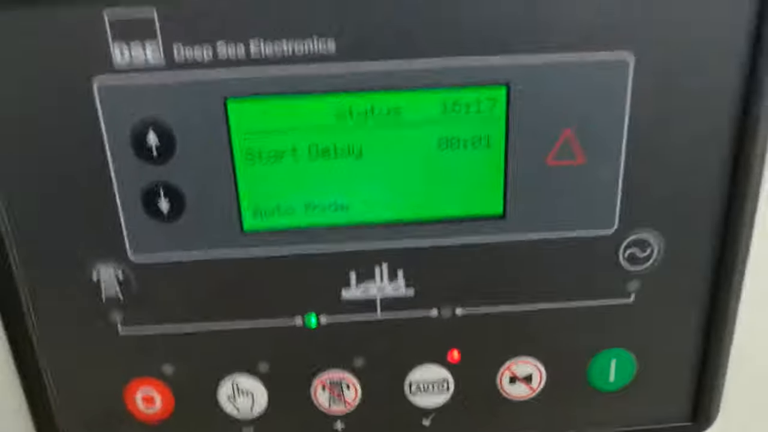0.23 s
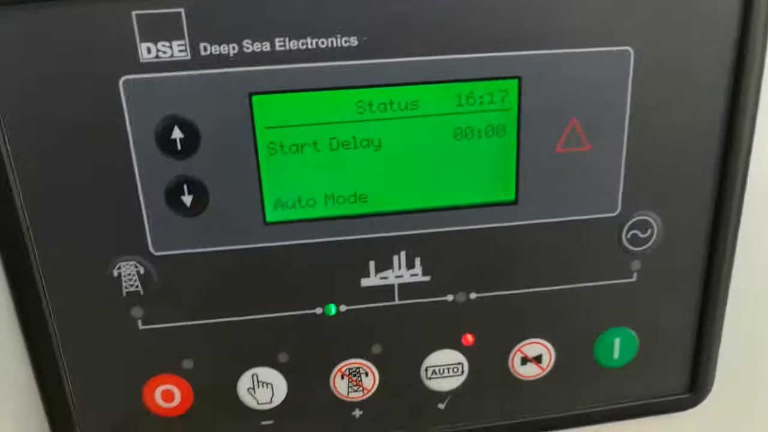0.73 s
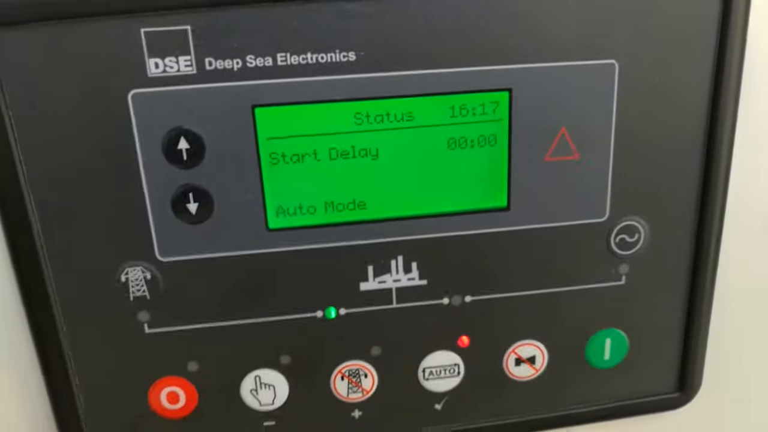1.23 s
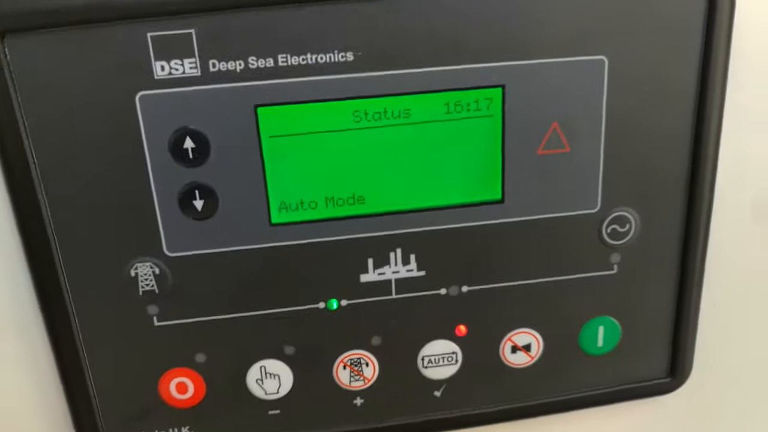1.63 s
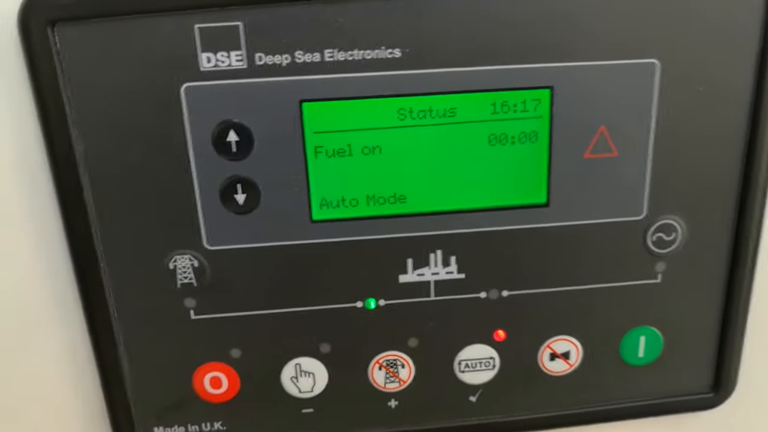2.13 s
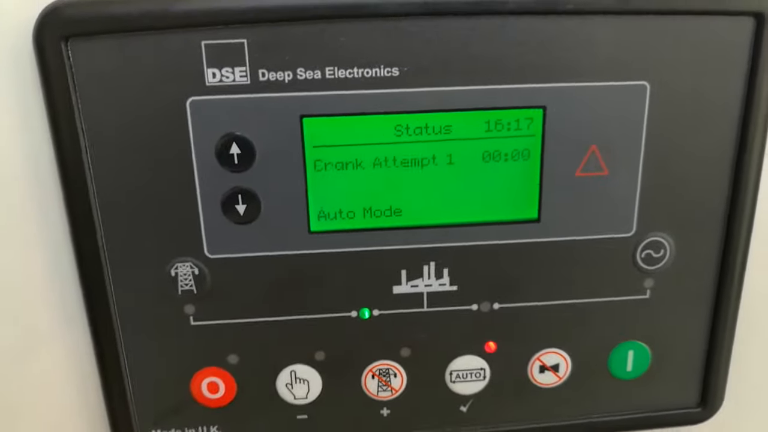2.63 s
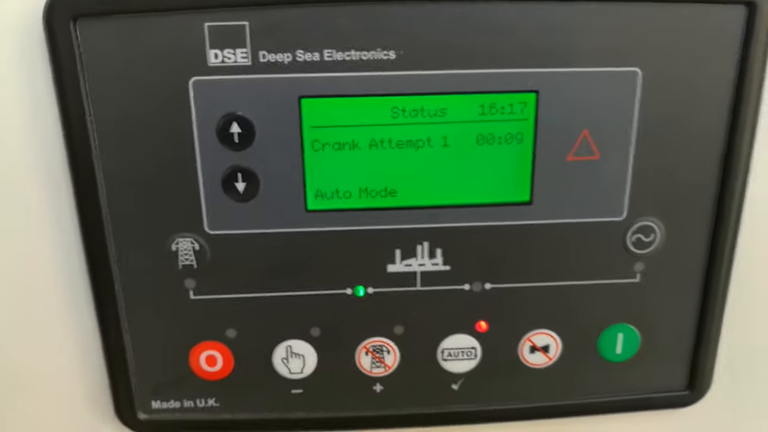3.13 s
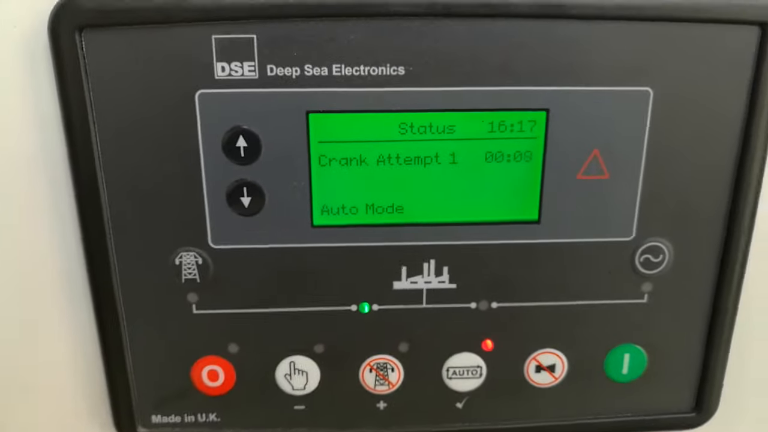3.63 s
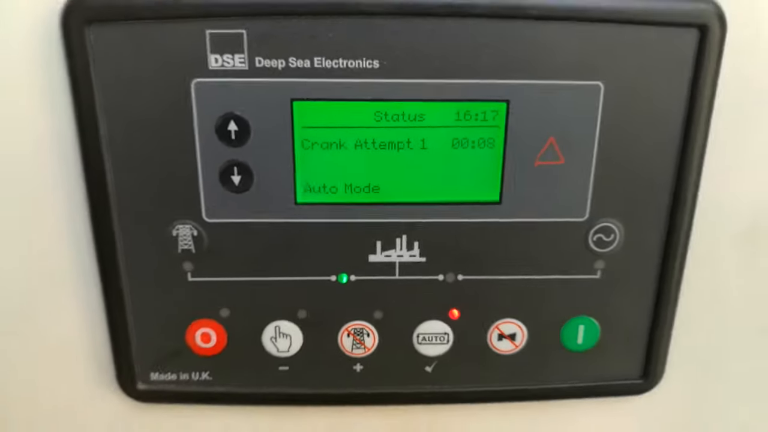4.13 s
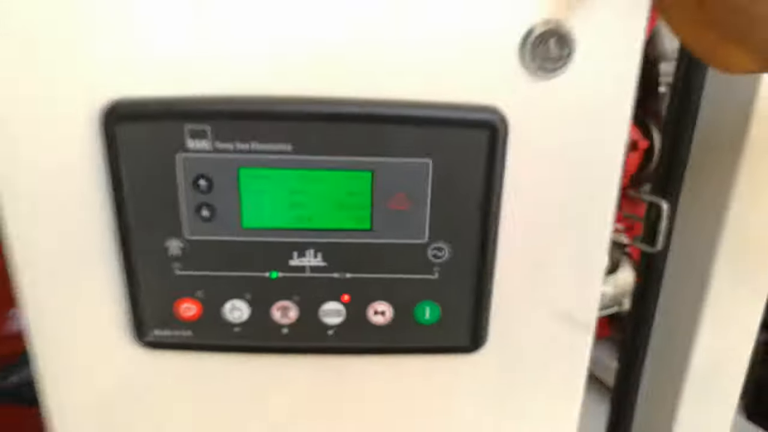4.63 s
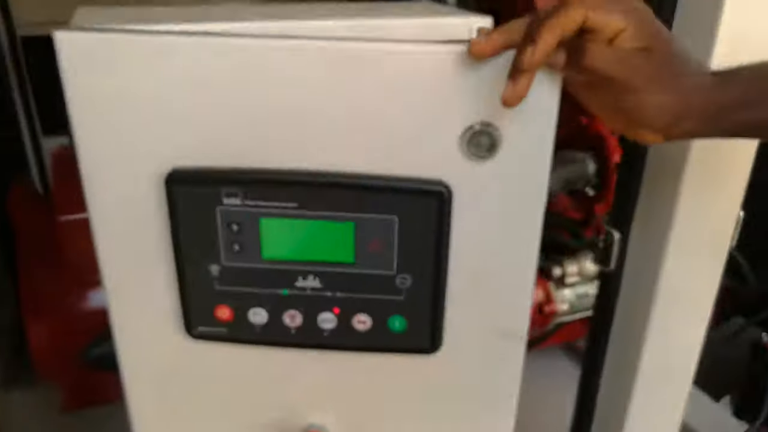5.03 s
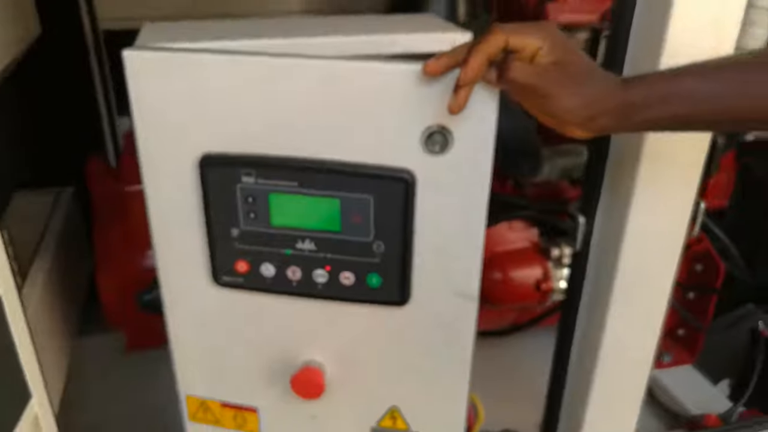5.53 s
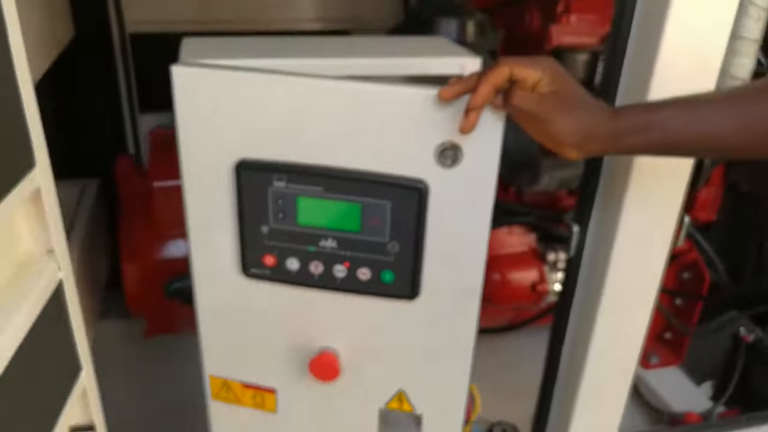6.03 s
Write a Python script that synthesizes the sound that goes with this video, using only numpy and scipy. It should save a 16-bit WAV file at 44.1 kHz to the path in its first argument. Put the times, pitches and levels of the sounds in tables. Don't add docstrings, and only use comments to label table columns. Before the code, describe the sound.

After two and a half hushed seconds, a starter bangs and whines, and a three-cylinder diesel generator fires, revs up hard and holds a steady drone.

```python
import sys
import numpy as np
from scipy import signal
from scipy.fft import rfft, irfft, next_fast_len
from scipy.io import wavfile
from scipy.ndimage import uniform_filter1d

SR = 44100
rng = np.random.default_rng(int(sys.argv[2]) if len(sys.argv) > 2 else 0)


def unload_audio(sound):
    columns = np.transpose(np.atleast_2d(sound))
    steps = np.round(np.clip(columns, -1, 1) * 32767)
    wavfile.write(sys.argv[1], SR, steps.astype(np.int16))


def voltage_ratio(level):
    return 10 ** (np.asarray(level, float) / 20)


N = 277080

REFUEL_S = 4.93
LOAD_ORDER, HIGH_ORDER = 10, 21

CRANK_TIMES = [2.45, 3.048, 3.145, 3.226]
CRANK_COUNTS = [0, 3, 4, 5]
# time in seconds, firings per second.
SPEED_CURVE = [
    (3.226, 13.3),
    (4.235, 42.2),
    (4.29, 42.6),
    (4.4, 41.9),
    (4.6, 40.5),
    (4.8, 38.8),
    (4.95, 38.2),
    (5.1, 39.),
    (6.28, 39.),
]
# time in seconds, exhaust pressure in dB, shaking of the block in dB.
EFFORT = [(2.53, -21, -33.5), (2.7, -31.5, -29.5), (2.76, -27.5, -35), (2.91, -35, -27),
          (3.02, -30.5, -34.5), (3.06, -25, -30.5), (3.21, -19.5, -29.5), (3.23, -19, -27),
          (3.38, -20, -26.5), (3.82, -14.5, -25.5), (4.21, -18.5, -25), (4.34, -19.5, -27.5),
          (4.86, -24.5, -29.5), (4.95, -25, -22.5), (5.2, -22.5, -27), (6.12, -24.5, -27.5),
          (6.28, -26, -28)]
# time in seconds, knock peak in dB, brightness in dB,
# pitch of the loose part in Hz, gas pulse in dB.
RUN_UP_FIRINGS = [(3.049, -8, -16, 5100, -4), (3.145, -16, -17, 2880, 2), (3.226, -3.5, -16, 2580, -1),
                  (3.295, -4.5, -12.5, 5330, 0), (3.359, -23, -4, 5550, -1), (3.414, -16.5, -16, 5570, 1.5),
                  (3.466, -16, -4, 4000, -7), (3.516, -12.5, -12, 3830, 1), (3.557, -12, -18, 5040, 4),
                  (3.601, -10, -20, 3500, 5), (3.643, -7.5, -22, 3570, 9), (3.684, -7.5, -4, 3270, 7),
                  (3.721, -8.5, -13, 3200, -1), (3.758, -10.5, -22, 2980, 7.5),
                  (3.789, -11.5, -23, 3490, 2), (3.82, -13.5, -28, 3930, -2), (3.852, -11, -11, 7340, 0),
                  (3.885, -9, -24, 3500, 8.5), (3.915, -7.5, -35, 3000, -7), (3.944, -10, -10, 5200, -8),
                  (3.977, -5.5, -17, 2700, 2), (4.007, -6, -26, 3030, 5), (4.032, -20, -8, 5600, 0),
                  (4.061, -8.5, -34, 3000, -7), (4.084, -11.5, -36, 3500, -2), (4.109, -9, -25, 5310, 2),
                  (4.138, -10, -25, 5240, 5), (4.161, -7.5, -33, 5600, 7), (4.187, -9.5, -25, 5560, 6)]
# time in seconds, peak in dB,
# brightness in dB, pitch of the loose part in Hz.
PINION_BANGS = [(2.441, -33, -4, 3500), (2.447, -19.5, 5.5, 3720), (2.455, -19, 4.5, 3850),
                (2.466, -7, -14, 3300), (2.473, -16, -10, 4230), (2.624, -33, 5, 4900),
                (2.65, -21, -20, 2650), (2.688, -16, -18, 3040), (2.809, -24.5, 2.5, 3130),
                (2.886, -20, -12, 3170), (2.919, -10, -16, 3660)]
# frequency in Hz, width in Hz, level in dB.
PIPE_MODES = [(30.5, 15, -8), (64.8, 13, 2.5), (96, 34, -2.5), (133.5, 5.1, 4.5), (159, 30, -8.5),
              (192, 14, 1.5), (220, 13, -16.5), (305, 14, -13), (342, 56, -11)]
# frequency in Hz, density in dB per Hz.
RUMBLE_SPECTRUM = [(15, -43), (25, -11), (118, -6), (172, -2), (227, -3), (270, -9.5), (334, -7),
                   (392, -23.5), (600, -19.5), (780, -54), (1320, -120)]
# multiple of the cycle rate, level in dB.
CYCLE_LINES = [(1, -41), (2, -32), (3, -14), (4, -27), (5, -15), (6, -14), (7, -26), (8, -20), (9, -22),
               (10, 0), (11, -21), (12, -22), (13, -5), (14, -21), (15, -17), (16, -11), (17, -22),
               (18, -21), (19, -27), (20, -22), (21, -26), (22, -24), (23, -22), (24, -14), (25, -26),
               (26, -17), (27, -18), (28, -25)]
# multiple of the cycle rate, level in dB.
SINGING_LINES = [(60, -23), (70, -22), (73, -15), (76, -15), (79, -18), (87, -18), (93, -21), (95, -16),
                 (105, -19), (117, -19), (126, -15), (129, -15), (132, -15), (149, -21), (167, -24),
                 (172, -23)]
# time in seconds, level over load in dB, rise and fall in seconds.
LINE_SURGE = [
    (4.98, 6., 0.09, 0.1),
]
# time in seconds, level in dB, frequency in Hz,
# half length in seconds.
ENCLOSURE_BOOMS = [(3.17, -30.5, 63, 0.1), (3.2, -31, 127.7, .07), (3.35, -25, 69.4, .06),
                   (3.35, -27, 135, 0.042), (3.34, -26.5, 186, 0.076), (3.47, -25.5, 106, 0.038),
                   (3.64, -23, 135.5, 0.047), (3.63, -27, 66.5, 0.062), (3.8, -34, 69.3, 0.05),
                   (3.96, -23, 191.4, 0.074), (4.0, -28, 316, 0.04), (4.14, -29, 305, 0.065),
                   (4.17, -26, 171, 0.024)]
# frequency in Hz, width in Hz, level in dB.
BLOCK_MODES = [(300, 32, -1), (529.5, 3.8, -12.5), (676, 73, -7), (957, 30, 5), (1048, 21, -2.5),
               (1216, 110, 5.5), (1440, 12, -7), (1547, 43, 5), (1820, 36, -41), (1946, 90, 3),
               (2470, 360, -12), (3160, 130, -46), (3850, 320, -51), (5000, 120, -34), (5250, 700, -32),
               (8900, 500, -82)]
# frequency in Hz, density in dB per Hz.
CLATTER_SPECTRUM = [(250, -31), (420, -11), (497, -9.5), (561, -16), (684, -3.5), (854, -7), (957, -2.5),
                    (1080, -5.5), (1240, -7), (1560, -6), (1680, -7.5), (2040, -8.5), (2600, -11.5),
                    (3380, -21), (5720, -120)]
# frequency in Hz, density in dB per Hz.
RATTLE_SPECTRUM = [(1350, -48), (2300, -3), (2950, 2.5), (3480, 3.5), (4100, 0.5), (4480, 1), (5450, -12),
                   (6000, -20), (7800, -88), (13200, -120)]
# frequency in Hz, density in dB per Hz.
HISS_SPECTRUM = [(2940, -45), (5000, 3.5), (7340, 0.5), (7940, -2), (8920, -1), (11400, -2.5), (15100, -7),
                 (16000, -6)]
# frequency in Hz, width in Hz, level in dB.
AIR_LEAKS = [(7600, 1500, 0), (9500, 2000, 0), (11500, 2000, 0)]
# frequency in Hz, width in Hz, level in dB.
LOOSE_TAPPET = [(1842, 86, 1), (1390, 150, -7), (1240, 75, -4)]
# frequency in Hz, width in Hz, level in dB.
LOADED_BLOCK = [(975, 130, 0), (1200, 300, 1), (1420, 300, -1), (1680, 260, 1), (1880, 200, -4),
                (2300, 500, -9)]
# time in seconds, level in dB, rise and fall in seconds.
LOADED_BLOCK_SWELL = [
    (4.97, -25.5, .07, .14),
    (6.1, -34.5, .7, 1.5),
]
# frequency in Hz, width in Hz, level in dB.
PANEL_MODES = [(531, 11.5, -10), (1020, 90, 2), (1550, 45, -3)]
# time in seconds, level in dB, rise and fall in seconds.
PANEL_SWELLS = [
    (3.95, -35, .2, .12),
    (4.16, -33, 0.1, 0.13),
    (5.0, -42, 0.098, 0.16),
]
# time in seconds, level in dB, rise and fall in seconds.
PINION_CHATTER = [
    (2.92, -34, 0.053, 0.056),
    (3.47, -37, 0.083, 0.27),
    (3.71, -29, 0.042, 0.047),
]
# time in seconds, frequency in Hz, level in dB.
COMPRESSION_WHINE = [
    (2.49, 1700, -60),
    (2.52, 1950, -37),
    (2.58, 2650, -38),
    (2.62, 2950, -35),
    (2.67, 2550, -37),
    (2.69, 2350, -55),
]
# time in seconds, frequency in Hz, level in dB.
FREE_WHINE = [(2.69, 2350, -60), (2.712, 2650, -38), (2.728, 3150, -33), (2.737, 3320, -24),
              (2.746, 3550, -30), (2.754, 3720, -27), (2.77, 4050, -36), (2.8, 4500, -44),
              (2.84, 4750, -43), (3.03, 4900, -52), (3.075, 4900, -33), (3.11, 4900, -35),
              (3.15, 4900, -60)]
# time in seconds, frequency in Hz, level in dB.
OVERRUN_WHINE = [
    (2.795, 3150, -70),
    (2.81, 3150, -29),
    (2.83, 3150, -55),
    (2.86, 3220, -50),
    (2.878, 3180, -28),
    (2.91, 2800, -30),
    (2.935, 2500, -60),
]
# pitch ratio, level in dB.
MESH_STRANDS = [(.86, -12), (1.12, -11), (1.7, -14)]
# frequency in Hz, width in Hz, level in dB.
HOUSING_MODES = [(939, 12, 8.5), (1256, 23, 7), (1820, 230, -12), (3250, 27, -24), (3730, 56, -27)]
# time in seconds, level in dB, rise and fall in seconds.
TOOTH_GRIND = [(2.51, -38, 0.03, 0.04), (2.6, -34, .06, .025), (2.655, -29, 0.015, 0.04),
               (2.73, -38, .03, .04), (2.82, -34, .015, .05), (2.895, -29, 0.02, 0.045)]
# time in seconds, level in dB, frequency in Hz, half
# length in seconds.
PART_RINGS = [(2.47, -24, 800, .012), (2.468, -28, 560, .012), (2.455, -30, 4300, .01),
              (2.87, -35, 850, .04), (2.93, -31, 3680, .015), (3.5, -30, 3850, .015),
              (3.695, -25, 3490, .014), (3.735, -28, 3480, .018), (3.41, -32, 2650, .012),
              (3.895, -30, 2680, .012), (3.57, -29, 1200, .012), (3.955, -37, 7500, .008),
              (4.035, -39, 7500, .006), (4.12, -36, 5300, .012), (4.985, -31, 1870, .02),
              (4.96, -31, 1410, .03), (5.0, -32, 1600, .025)]
# time in seconds, level in dB, rise and fall in seconds.
PINION_CRACK = [
    (2.448, -20.5, 0.0014, .012),
    (2.472, -32, .01, 0.01),
]
# frequency in Hz, width in Hz, level in dB.
PINION_CRACK_BAND = [(8700, 7100, 0)]
# time in seconds, level in dB, rise and fall in seconds.
FRAME_THUD = [
    (2.474, -26, 0.013, 0.017),
    (2.92, -29.5, 0.0097, 0.038),
]
# frequency in Hz, width in Hz, level in dB.
FRAME_MODES = [(193, 200, -3.5), (300, 110, -2.5)]
# loudest time in seconds, level
# in dB, rise and fall in seconds.
STROKES_AND_BURSTS = [
    (.02, -52, 0.058, 0.074),
    (.69, -48.5, 0.074, 0.087),
    (.85, -54, 0.043, 0.071),
    (1.49, -51, 0.072, 0.11),
    (1.737, -57, 0.0044, 0.0068),
    (1.87, -70, 0.024, 0.045),
    (2.18, -48.5, 0.089, 0.1),
    (2.445, -44, 0.0085, 0.049),
]
# frequency in Hz, density in dB per Hz.
BRISTLE_SPECTRUM = [(1180, -19), (2000, -9), (2440, -6.5), (2780, 1), (3230, -3.5), (4410, 2.5), (5730, -1),
                    (12200, 1), (16000, -1.5)]
# time in seconds, level in dB, rise and fall in seconds.
DRY_SCUFF = [
    (1.87, -68.5, 0.043, 0.058),
]
# frequency in Hz, width in Hz, level in dB.
DRY_SCUFF_BAND = [(4840, 1900, 0)]
# time in seconds, peak in dB, frequency in Hz, decay in seconds.
RELAY_TICKS = [
    (.028, -46, 2400, .015),
    (.03, -54, 1000, .012),
    (.356, -56, 300, .006),
    (.358, -62, 1270, .006),
    (1.732, -45, 4600, .008),
    (1.733, -60, 1600, .007),
    (1.739, -45, 3450, .011),
]
# time in seconds, level in
# dB, frequency in Hz, half length in seconds.
FAR_TONES = [(.035, -66, 1240, .018), (.04, -71, 690, .025), (.75, -78, 892, .25), (1.15, -75, 500, .04),
             (1.96, -72, 520, .03), (2.28, -77, 1260, .05), (2.35, -73, 1190, .04), (2.33, -69, 305, .05)]
# frequency in Hz, width in Hz, level in dB.
HUM_BANDS = [(144, 8, 0), (192, 10, -2), (245, 30, -14)]
# time in seconds, level in dB, rise and fall in seconds.
HUM_SWELLS = [(0., -51, .1, 0.11), (.26, -60, 0.066, 0.066), (.49, -67, 0.052, 0.04), (.8, -61, 0.12, 0.27),
              (1.25, -70, .1, .1), (2.3, -65, 0.05, 0.072)]
# frequency in Hz, width in Hz, level in dB.
FAINT_WHIRS = [(690, 16, -82), (892, 10, -83), (1068, 10, -84), (3350, 110, -83)]
# frequency in Hz, density in dB per Hz.
YARD_SPECTRUM = [(15, -39), (25, 0.5), (111, -18), (149, -9), (263, -27), (293, -20.5), (363, -26.5),
                 (503, -31), (607, -31), (677, -27), (734, -32), (1700, -26.5), (2910, -38), (3430, -38.5),
                 (16000, -65)]
# frequency in Hz, left-right likeness from -1 to 1.
PORT_LIKENESS = [(60, 1.), (130, 1), (250, 0.95), (400, -.05), (1000, -.08), (16000, 0.)]
# frequency in Hz, left minus right in dB.
PORT_BIAS = [(60, 0), (250, .5), (500, -1.5), (1000, -.4), (2000, 1.1), (4000, 2.6), (8000, 6.5),
             (13000, 2)]


def firings():
    t = np.arange(N) / SR
    powered_rate = in_time(SPEED_CURVE)[0] * (t > CRANK_TIMES[-1])
    return np.interp(t, CRANK_TIMES, CRANK_COUNTS) + np.cumsum(powered_rate) / SR


def exhaust(turn, level_db):
    fired = np.flatnonzero(np.diff(np.floor(turn)))
    pulses = np.zeros(N)
    cylinder_db = np.array([0, -5., -2.5])
    chance_db = 0.64 * rng.standard_normal(len(fired))
    pulses[fired] = voltage_ratio(cylinder_db[np.arange(len(fired)) % 3] + chance_db)
    pulses[fired[2:2 + len(RUN_UP_FIRINGS)]] = 0
    run_up = np.array(RUN_UP_FIRINGS)
    pulses[(run_up[:, 0] * SR).astype(int)] = voltage_ratio(run_up[:, 4] - 10.0)
    drive = rms_one(pulses) + .4 * rng.standard_normal(N)
    pipe = sum((-1) ** k * voltage_ratio(db) * resonate(drive, hz, width)
               for k, (hz, width, db) in enumerate(PIPE_MODES))
    pipe = pipe / np.sqrt(uniform_filter1d(pipe ** 2, size=16000) + 1e-12)
    settled = np.clip((np.arange(N) / SR - 4.05) / 0.62, 0, 1)
    rumble = coloured(rng.standard_normal(N), RUMBLE_SPECTRUM)
    rumble_db = -3.5 - 1.5 * between(REFUEL_S, 9, 0.34)
    return voltage_ratio(level_db) * (voltage_ratio(-3.5 - 18.0 * settled) * pipe + voltage_ratio(rumble_db) * rumble)


def orders(turn):
    loaded_db, coasting_db, other_lines_db = -26.5, -37.5, -27
    load = voltage_ratio(coasting_db + (loaded_db - coasting_db) * between(REFUEL_S, 9, 0.089))
    high = load + voltage_ratio(loaded_db) * swells(LINE_SURGE)
    first, lines = int(4 * SR), np.zeros(N)
    for k, db in CYCLE_LINES + SINGING_LINES:
        if k > CYCLE_LINES[-1][0]:
            gain = load * voltage_ratio(-2.5) * between(5.1, 9, 0.45) * voltage_ratio(1.8 * drift(13.0))
        elif k == LOAD_ORDER:
            gain = load
        elif k > HIGH_ORDER:
            gain = high
        else:
            gain = voltage_ratio(other_lines_db)
        level = gain * voltage_ratio(db + 0.12 * drift(2.4))
        lines[first:] += level[first:] * np.sin(2 * np.pi * (k * turn[first:] / 3 + rng.random()))
    return voltage_ratio(3.0) * between(4.1, 9, 0.13) * lines


def contacts(turn, count, spread_db):
    angle, size = np.sort(rng.random(count)), rng.standard_normal(count)
    cylinder = voltage_ratio(spread_db * rng.standard_normal((3, count)))
    clicks = np.zeros(N)
    for n in range(int(turn[-1]) - 1):
        at = np.searchsorted(turn, n + angle)
        clicks[at] += size * cylinder[n % 3] * voltage_ratio(2.5 * rng.standard_normal(count))
    return clicks / np.sqrt(uniform_filter1d(clicks ** 2, size=8000) + 1e-6)


def throb(turn, once_db, twice_db):
    return voltage_ratio(once_db * np.cos(2 * np.pi * turn) + twice_db * np.cos(4 * np.pi * turn + 0.5))


def block_ring(blows, bright_db, spread_db):
    out = 0
    for k, (hz, width, db) in enumerate(BLOCK_MODES):
        struck = voltage_ratio(db + bright_db * (hz > 2900) + spread_db * rng.standard_normal())
        out = out + (-1) ** k * struck * resonate(blows, hz, width) * np.sqrt(100 / width)
    return out


def block(turn, shake_db):
    t = np.arange(N) / SR
    metal = contacts(turn, count=40, spread_db=2.0)
    white = rng.standard_normal((3, N))
    swing_db = shake_db + 29
    pinion_drag = np.clip((4.67 - t) / 0.47, 0, 1)
    rattle_db = -36.5 + 0.64 * swing_db + 5.5 * pinion_drag
    spin_up = np.exp(-np.maximum(t - CRANK_TIMES[0], 0) / 0.22)
    starter_released = between(4.37, 9, 0.066)
    hiss_db = -34.5 - 13.5 * spin_up + 0.24 * swing_db - 6 * starter_released

    shake = .45 * metal + white[0] * throb(turn, 2.6, .7)
    ring = rms_one(block_ring(shake, bright_db=15.0, spread_db=5.0))
    clatter = rms_one(coloured(shake, CLATTER_SPECTRUM) + 0.08 * ring)
    coasting = between(4.3, REFUEL_S, 0.086)
    clatter = clatter - 0.4 * coasting * resonate(clatter, 2450, 1000)

    rattle = coloured(white[1:3] * throb(turn, 0.65, 0.85), RATTLE_SPECTRUM)
    hiss = coloured(white[1:3] * throb(turn, 1.0, 0.97), HISS_SPECTRUM)
    leaks = sum(voltage_ratio(db + 4. * drift(14)) * resonate(hiss, hz, width) for hz, width, db in AIR_LEAKS)
    hiss = hiss + voltage_ratio(-4.0) * leaks

    tappet_gain = voltage_ratio(-20 + 8 * np.cos(2 * np.pi * turn / 3))
    tappet = between(REFUEL_S - .05, 9, .04) * tappet_gain * narrow(white[2], LOOSE_TAPPET)
    panels = swells(PANEL_SWELLS) * narrow(white[1], PANEL_MODES)
    loaded = swells(LOADED_BLOCK_SWELL) * throb(turn, 0.74, 1.6) * rms_one(narrow(shake, LOADED_BLOCK))
    body = voltage_ratio(shake_db - 2.0) * (clatter + tappet) + panels + loaded
    diffuse = (voltage_ratio(rattle_db) + swells(PINION_CHATTER)) * rattle + voltage_ratio(hiss_db + 0.5) * hiss
    return body, diffuse


def knocks():
    out = np.zeros(N)
    t = np.arange(2000) / SR
    burst = np.minimum(t / .002, 1) * np.exp(-t / .014)
    dull = signal.butter(4, 7100, fs=SR)
    for s, peak_db, bright_db, part_hz, *_ in PINION_BANGS + RUN_UP_FIRINGS:
        blows, at = np.zeros(9000), round((s - .002) * SR)
        blows[:2000] = burst * rng.standard_normal(2000)
        body = block_ring(blows, bright_db, spread_db=1.5) + 0.59 * resonate(blows, 1340, 1570)
        bright = voltage_ratio(-14.0) * signal.lfilter(*dull, blows) + voltage_ratio(6.5) * resonate(blows, part_hz, 410)
        out[at:at + 9000] += voltage_ratio(peak_db + 5.0) * (body + voltage_ratio(bright_db) * bright)
    return out


def mesh(rows):
    hz, level_db = in_time(rows)
    span = slice(int(2.4 * SR), int(3.3 * SR))
    wavering_hz = hz * (1 + .007 * drift(120))
    phase, out = 2 * np.pi * np.cumsum(wavering_hz)[span] / SR, np.zeros(N)
    for ratio, db in [(0.97, 0)] + MESH_STRANDS:
        out[span] += np.sin(ratio * phase) * voltage_ratio(level_db + db + 3.5 + 3. * drift(45))[span]
    return out


def starter():
    teeth = rng.standard_normal(N)
    housing = rms_one(sum(voltage_ratio(db) * resonate(teeth, hz, width) for hz, width, db in HOUSING_MODES))
    whine = (mesh(COMPRESSION_WHINE) + mesh(FREE_WHINE) + mesh(OVERRUN_WHINE)) * between(2.49, 3.2, .01)
    crack = swells(PINION_CRACK) * narrow(teeth, PINION_CRACK_BAND)
    thud = swells(FRAME_THUD) * narrow(teeth, FRAME_MODES)
    grind = housing * voltage_ratio(4.5) * swells(TOOTH_GRIND) * between(2.48, 3.05, 0.018)
    return whine + blips(PART_RINGS) + crack + thud + grind


def broom():
    strokes = lingering(swells(STROKES_AND_BURSTS, edge=2.25)) * between(-1, 2.6, .1)
    return strokes * coloured(rng.standard_normal(N), BRISTLE_SPECTRUM)


def relay():
    ticks = np.zeros(N)
    for s, peak_db, hz, decay in RELAY_TICKS:
        tap = rng.standard_normal(3000) * np.exp(-np.arange(3000) / (decay * SR))
        ring = resonate(resonate(tap, hz, .3 * hz), hz, hz)
        ring = ring + .1 * resonate(resonate(tap, 2 * hz, 3 * hz), 2 * hz, 3 * hz)
        ticks[round(s * SR):round(s * SR) + 3000] += voltage_ratio(peak_db) * ring / np.max(np.abs(ring))
    return ticks


def yard():
    floor = voltage_ratio(-54 - 7.0 + 0.3 * drift(2.5)) * coloured(rng.standard_normal(N), YARD_SPECTRUM)
    floor = floor + voltage_ratio(-85.0) * rng.standard_normal(N)
    white = rng.standard_normal(N)
    drone = narrow(white, HUM_BANDS)
    drone = drone / np.sqrt(uniform_filter1d(drone ** 2, size=5000) + 0.089)
    hum = (voltage_ratio(-64) + swells(HUM_SWELLS)) * drone + narrow(white, FAINT_WHIRS)
    scuff = swells(DRY_SCUFF) * narrow(white, DRY_SCUFF_BAND)
    return floor + hum + scuff + broom() + relay() + blips(FAR_TONES)


def two_ports(x, diffuse):
    size = next_fast_len(N + 20000)
    hz = np.maximum(np.arange(size // 2 + 1) * SR / size, 1)
    echoes = rng.standard_normal(10000) * np.exp(-np.arange(10000) / (.055 * SR))
    other = rfft(echoes / np.sqrt(np.sum(echoes ** 2)), size)
    alike = np.clip(at_hz(PORT_LIKENESS, hz), -.5, 1)
    mix = 1 + np.sqrt((1 - alike) / (1 + alike)) * other * [[1], [-1]]
    mix = mix * np.sqrt(2 / (1 + alike) / uniform_filter1d(np.abs(mix) ** 2, size=900))
    halves = np.array([[.5], [-.5]])
    lag_s = .00018 / (1 + (hz / 300) ** 4)
    bias = voltage_ratio(at_hz(PORT_BIAS, hz) * halves) * np.exp(-2j * np.pi * hz * lag_s * halves)
    return irfft((rfft(x, size) * mix + voltage_ratio(2.5) * rfft(diffuse, size)) * bias, size)[:, :N]


def blips(rows):
    t = np.arange(N) / SR
    return sum(voltage_ratio(db + 3.5) * np.exp(-((t - s) / half) ** 2) * np.sin(2 * np.pi * hz * t)
               for s, db, hz, half in rows)


def swells(rows, edge=2):
    t = np.arange(N) / SR
    total = 0
    for s, db, rise, fall in rows:
        before, after = (np.abs(s - t) / rise) ** edge, ((t - s) / fall) ** 2
        total = total + voltage_ratio(db) * np.exp(-np.where(t < s, before, after))
    return total


def lingering(gain):
    r = np.exp(-1 / (.09 * SR))
    return gain + voltage_ratio(-18.) * signal.lfilter([2 * (1 - r)], [1, -r], gain)


def narrow(white, bands):
    return sum(voltage_ratio(db) * rms_one(resonate(resonate(white, hz, width), hz, width)) for hz, width, db in bands)


def resonate(x, hz, width_hz):
    r = np.exp(-np.pi * width_hz / SR)
    feedback = [1, -2 * r * np.cos(2 * np.pi * hz / SR), r * r]
    return signal.lfilter(np.array([1, 0, -1]) * (1 - r * r) / 2, feedback, x + 1e-18)


def coloured(x, spectrum):
    size = next_fast_len(N)
    hz = np.maximum(np.arange(size // 2 + 1) * SR / size, 1)
    return rms_one(irfft(rfft(x, size) * voltage_ratio(at_hz(spectrum, hz)), size)[..., :N])


def drift(rate):
    r = np.exp(-80 * np.pi * rate / SR)
    slow = signal.lfilter([1], [1, -2 * r, r * r], rng.standard_normal(N // 40 + 2002))[2000:]
    return np.interp(np.arange(N) / 40, np.arange(len(slow)), rms_one(slow))


def rms_one(x):
    return x / np.sqrt(np.mean(x ** 2) + 1e-20)


def in_time(rows):
    s, *columns = np.transpose(rows)
    return [np.interp(np.arange(N) / SR, s, c) for c in columns]


def between(start, stop, fade):
    t = np.arange(N) / SR
    return np.clip((t - start) / fade, 0, 1) * np.clip((stop - t) / fade, 0, 1)


def at_hz(points, hz):
    return np.interp(np.log(hz), np.log(np.array(points)[:, 0]), np.array(points)[:, 1])


def scene():
    turn = firings()
    pressure_db, shake_db = in_time(EFFORT)
    gas = between(2.465, 9, 0.0032) * exhaust(turn, pressure_db - 3.0) + orders(turn) + blips(ENCLOSURE_BOOMS)
    body, diffuse = block(turn, shake_db)
    running = between(2.445, 9, 0.006)
    return two_ports(yard() + gas + running * body + knocks() + starter(), running * diffuse)


def roll_off(x):
    return signal.sosfilt(signal.butter(12, 16000, fs=SR, output="sos"), x)


def record(dry):
    rounded = 1.219 * np.tanh(dry / 1.141)
    top_cut = signal.cheby2(12, 60, 16700, fs=SR, output="sos")
    return roll_off(signal.sosfilt(top_cut, rounded))


dry = scene()
out = record(dry)
unload_audio(out)
```